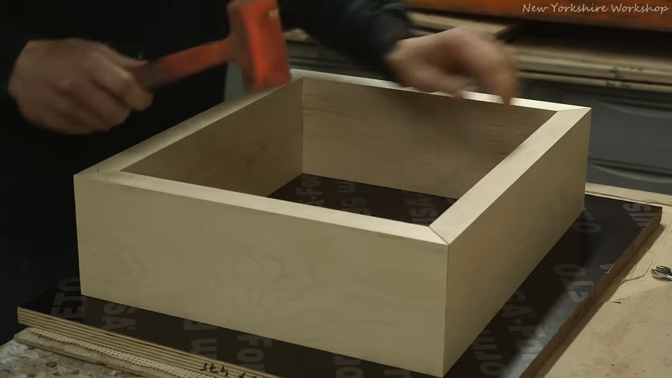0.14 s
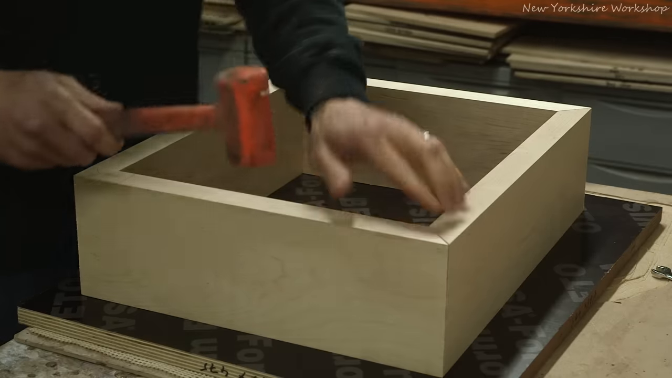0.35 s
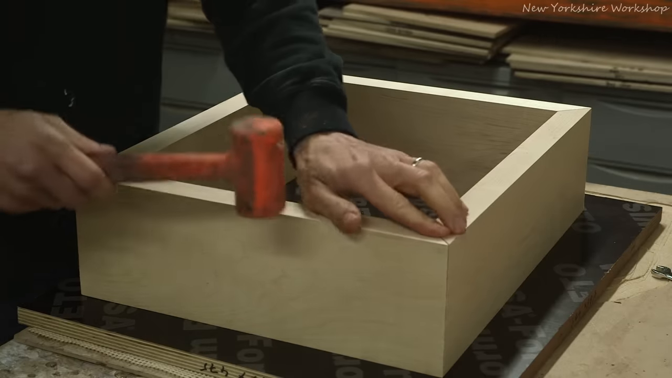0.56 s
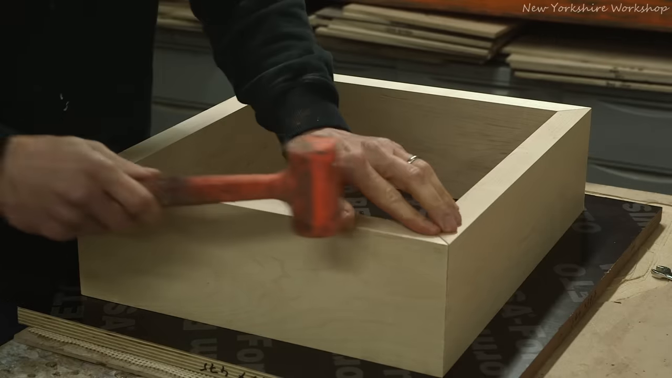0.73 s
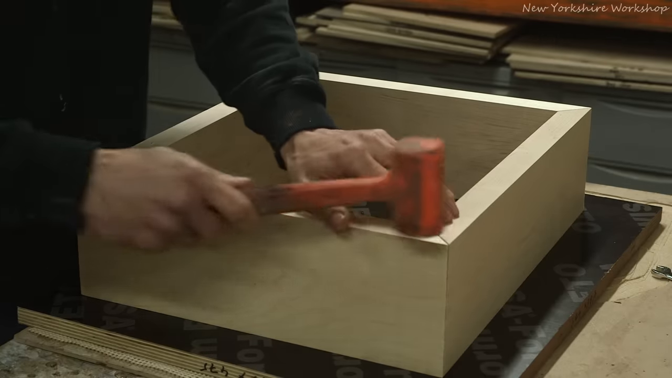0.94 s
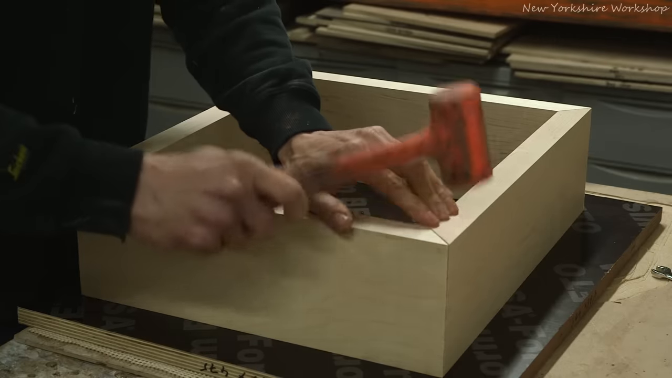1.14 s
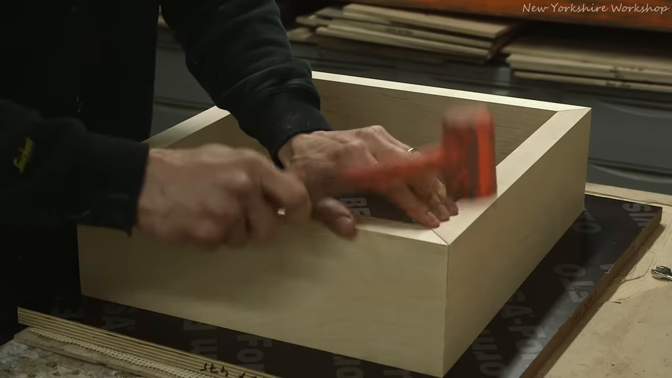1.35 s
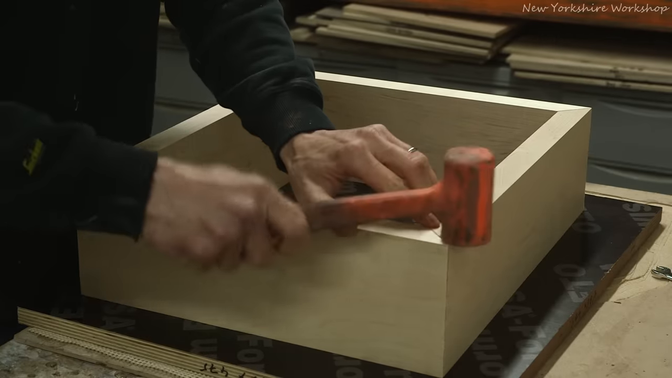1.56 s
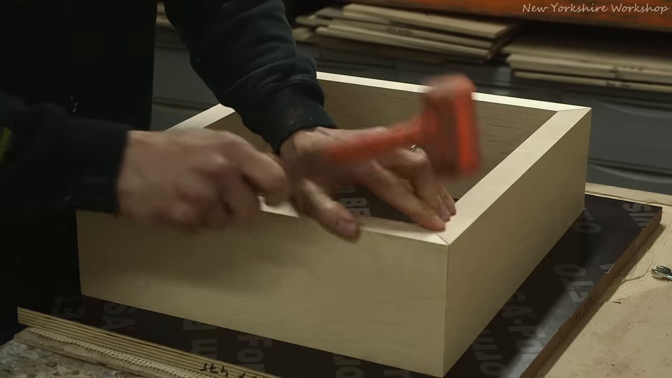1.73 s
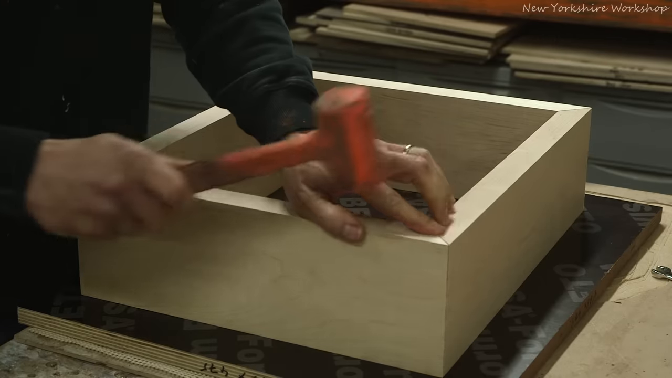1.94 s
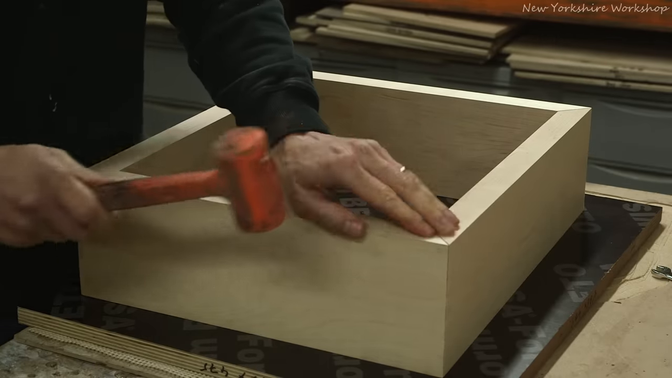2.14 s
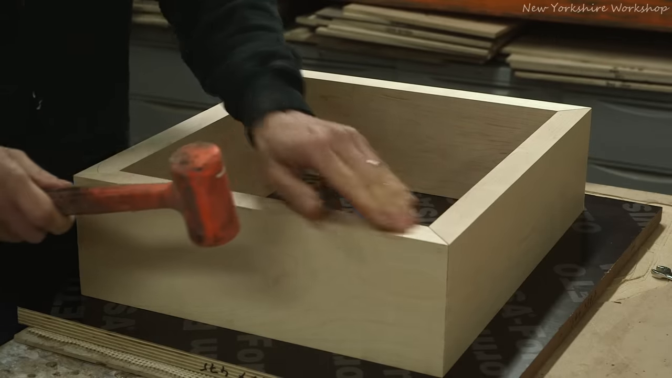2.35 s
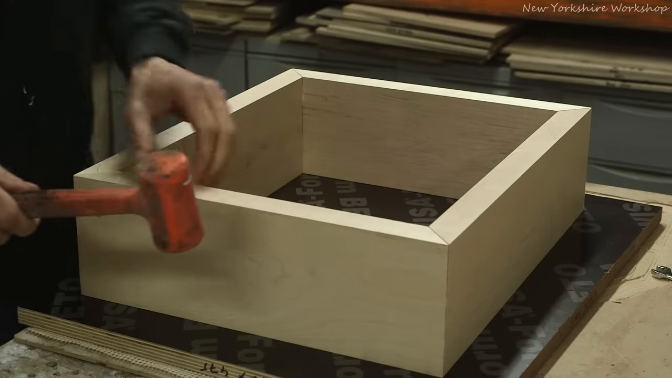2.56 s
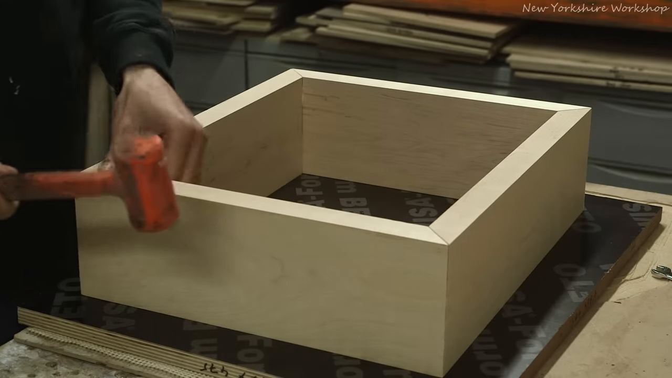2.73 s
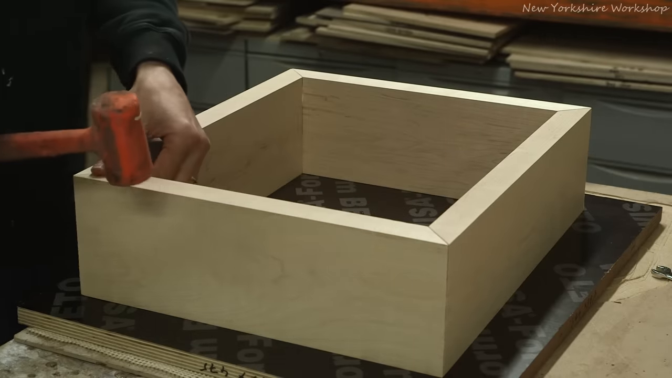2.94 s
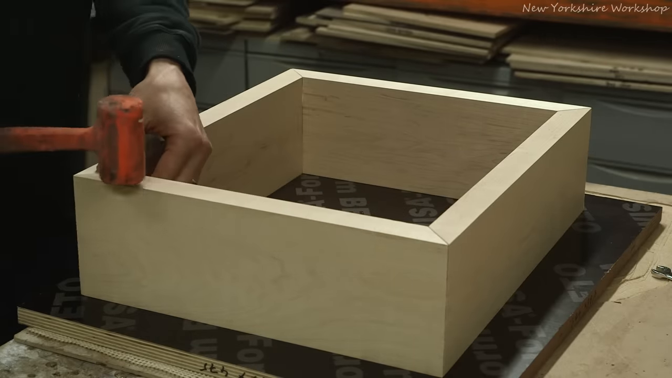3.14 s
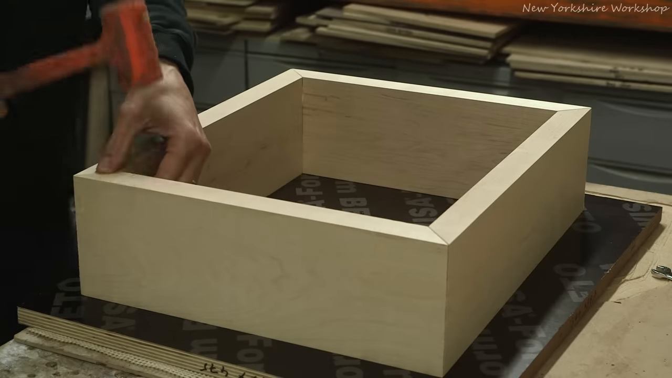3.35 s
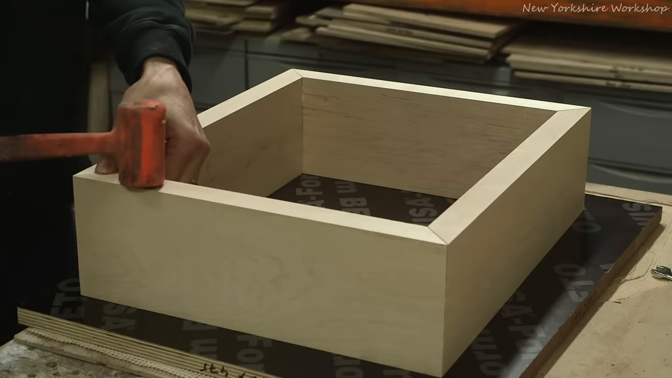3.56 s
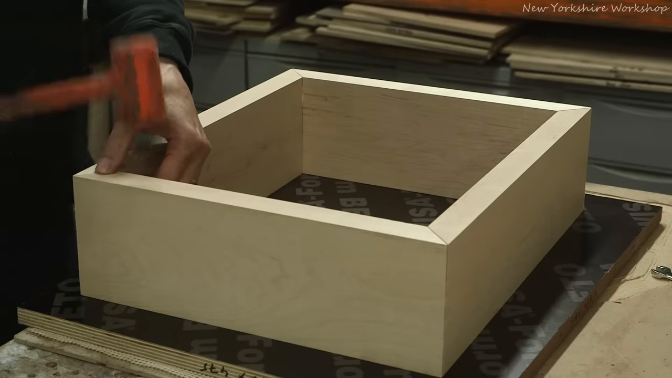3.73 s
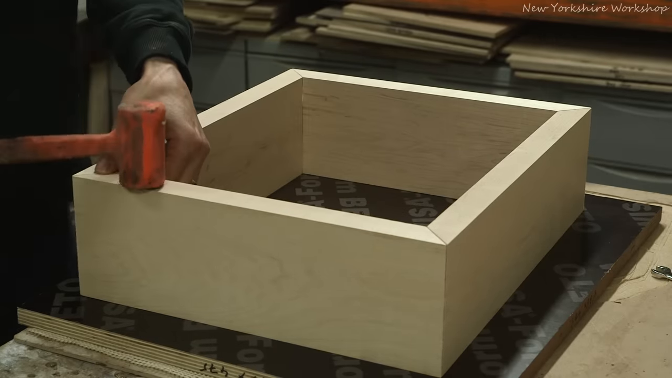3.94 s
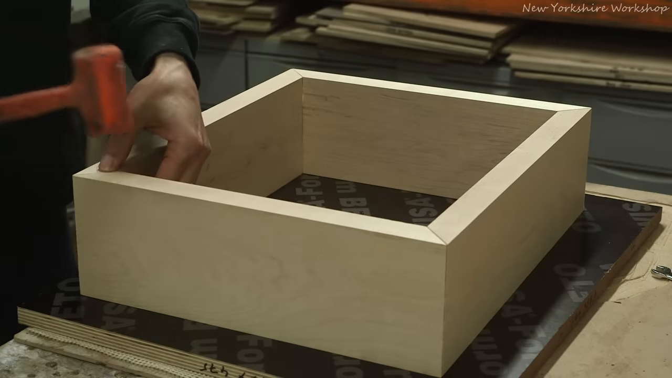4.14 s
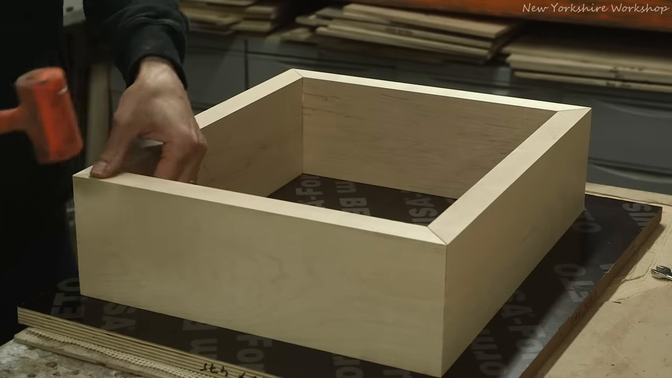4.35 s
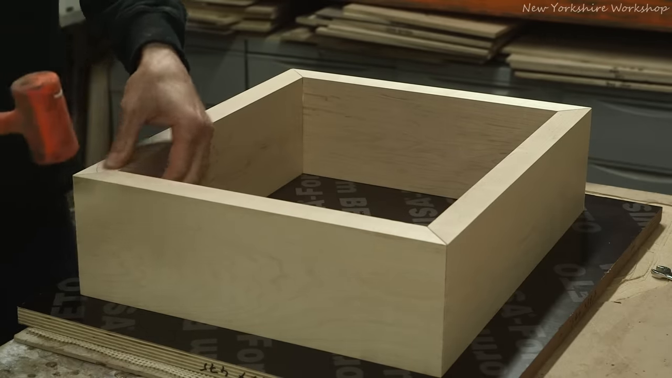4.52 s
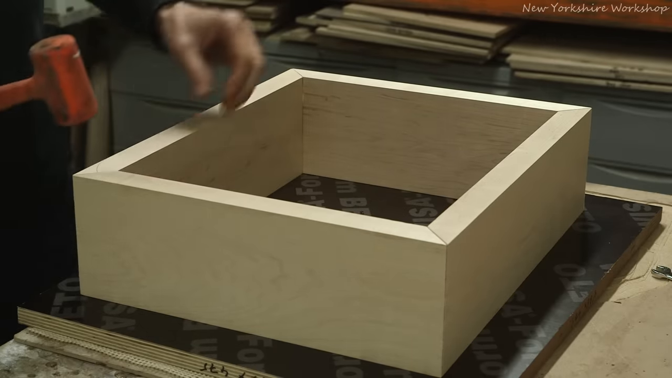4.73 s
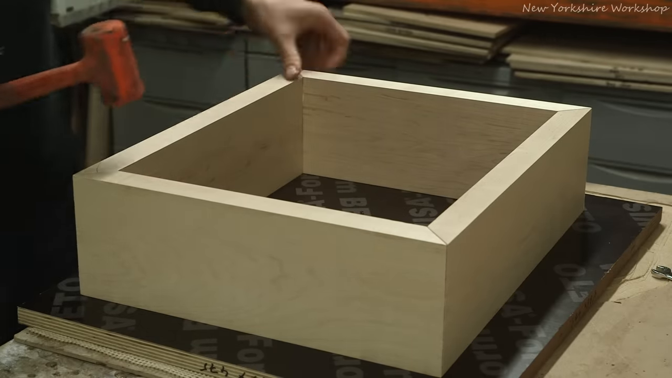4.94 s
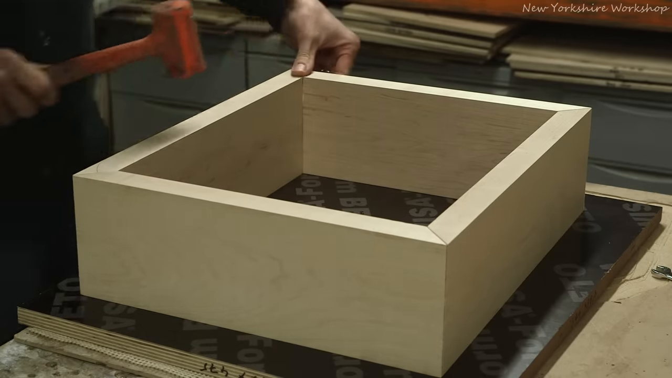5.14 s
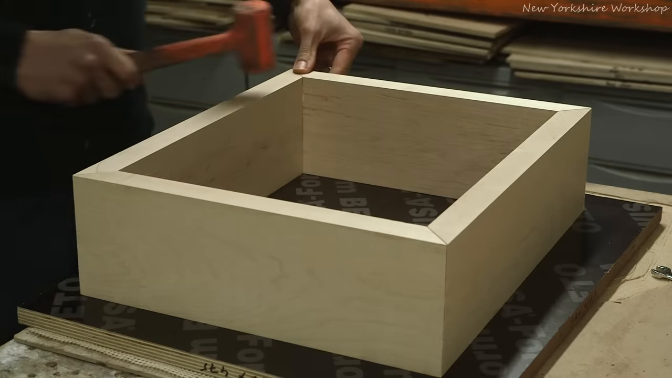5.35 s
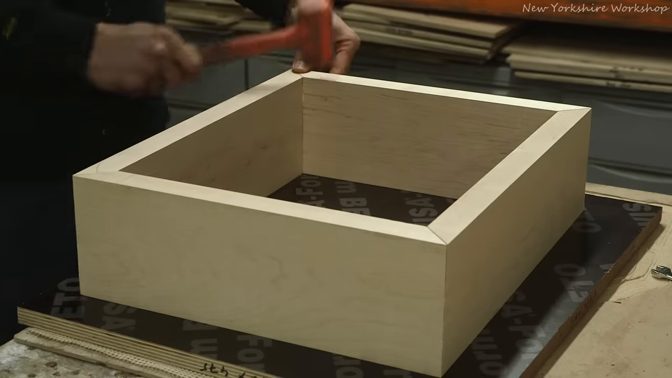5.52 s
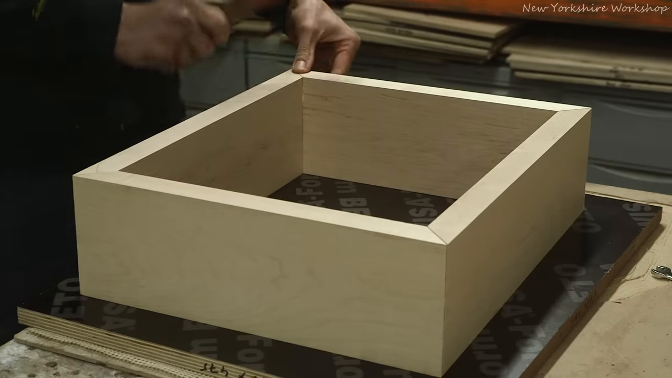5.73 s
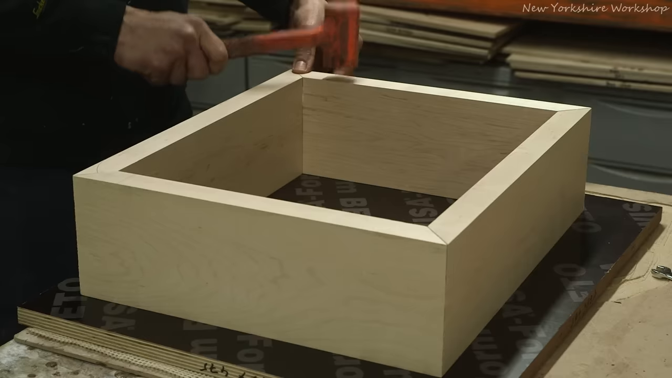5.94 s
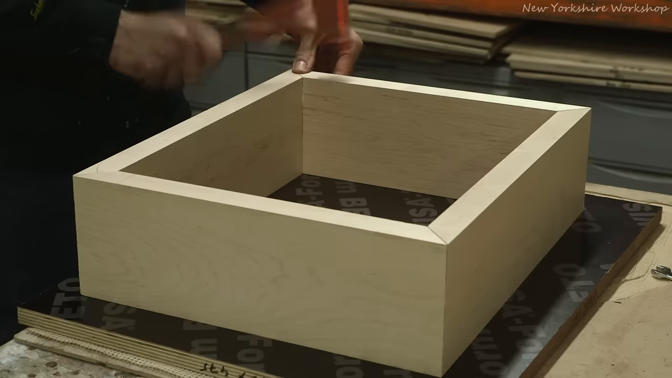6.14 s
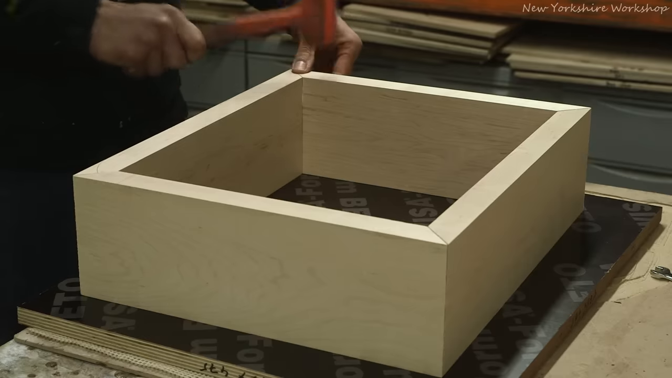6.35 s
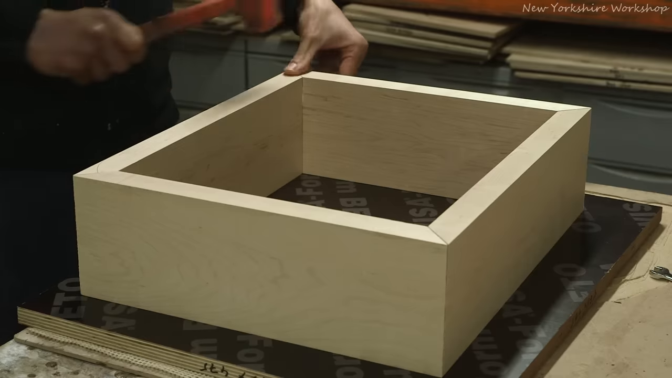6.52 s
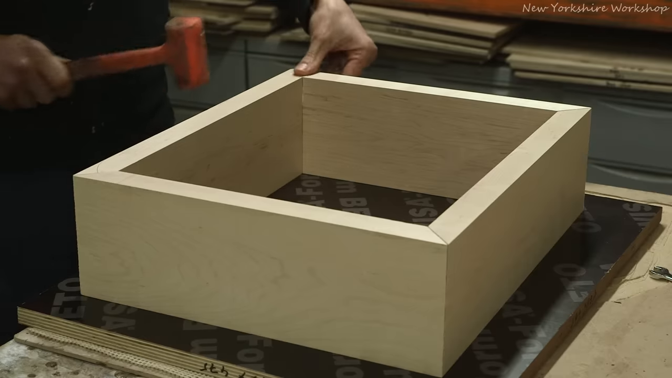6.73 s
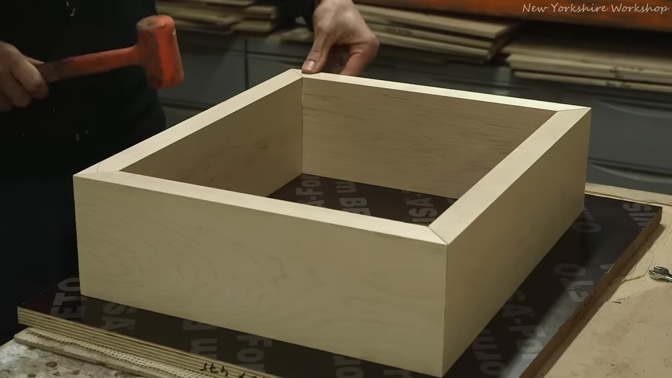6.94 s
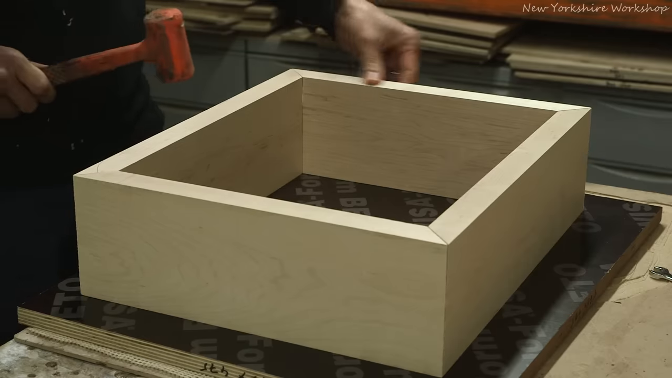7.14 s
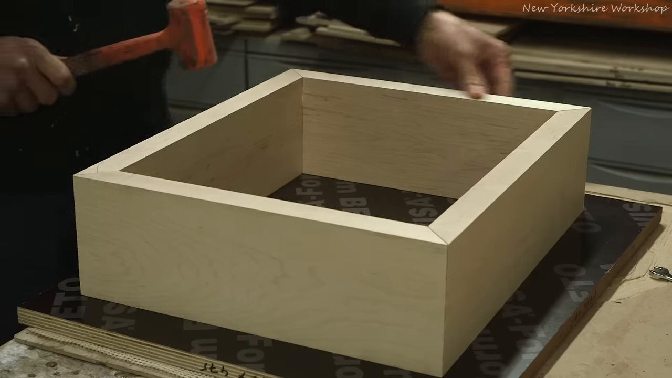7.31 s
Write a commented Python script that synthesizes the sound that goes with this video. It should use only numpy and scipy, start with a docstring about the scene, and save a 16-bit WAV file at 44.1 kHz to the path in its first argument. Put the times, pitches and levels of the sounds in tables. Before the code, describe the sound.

A shot-filled mallet knocks a wooden frame on a workbench six times, in three pairs about two seconds apart. Each blow is a sharp, woody knock with a short room ring, preceded by a tiny hiss of shot in the head. Between the pairs, sleeves rustle faintly and fingers rub and touch the wood. The knocks are close and central, over a quiet ventilation hum.

```python
"""Ventilation hums in a workshop; sleeves rustle and loose shot slides in a mallet's head as it is tipped.
From 1.2 s the mallet gives two blows to each of three corners of a wooden frame on a bench. The shot
hisses on the downswing; head, then shot, push the boards into short rings that the room carries on.
After each pair, fingers rub the joints and the wood is lightly touched. Sleeves rustle to the end."""
import sys
import numpy as np
from scipy import signal
from scipy.fft import rfft, irfft, next_fast_len
from scipy.io import wavfile

SR = 44100
rng = np.random.default_rng(int(sys.argv[2]) if len(sys.argv) > 2 else 0)


def unload_wav(signal):
    """Save mono or channel-first audio to the path in sys.argv[1] as 16-bit WAV at rate SR, clipped to [-1, 1]."""
    wavfile.write(
        sys.argv[1],
        SR,
        np.round(np.clip(np.atleast_2d(signal).T, -1, 1) * 32767).astype(np.int16),
    )


N = 329861

# Two blows a corner. Each row: start in s, level in dB, contact in ms, shot lag in ms,
# shot re head in dB, crack re knock in dB, bench thump in dB.
MALLET_BLOWS = [(1.2052, -24, 0.22, 3.4, 9, -19, 3), (1.5302, -17.5, 0.095, 1.98, 5.5, -10, -5),
                (3.4888, -18.5, 0.086, 3, 3, -16, -5), (3.8812, -19, 0.057, 2.13, 10, -9, -9),
                (5.7930, -17, 0.063, 2.4, 7, -10.5, -4), (6.1652, -16, 0.077, 2.8, 5, -11, -1)]
# Workshop reverb. Each row: frequency in Hz, t60 in s, level in dB, side re mid in dB.
ROOM_BANDS = [(60, 0.27, -2, -23), (120, 0.49, 3, -25.5), (230, 0.81, -3, -22), (460, .55, -2, -18),
              (888.9, 0.58, -3, -12), (1920, 0.54, -5.5, -6.5), (3700, 0.53, -9.5, -3),
              (5430, 0.51, -7.5, -0.5), (7600, .3, -7, -1.5), (10800, 0.24, -6.5, -0.5),
              (14800, .16, -7, -7)]


def undb(db):
    """dB to gain."""
    return 10 ** (np.asarray(db) / 20)


def unit(x):
    """Scale to rms 1."""
    return x / np.sqrt(np.mean(x ** 2))


def along(hz, table, column=1):
    """Read a table column on a log-frequency axis."""
    table = np.array(table, float)
    return np.interp(np.log(np.maximum(hz, 1)), np.log(table[:, 0]), table[:, column])


def shaped(x, db_at_hz):
    """Filter by a function of Hz that gives dB."""
    size = next_fast_len(x.shape[-1])
    gain = undb(db_at_hz(np.arange(size // 2 + 1) * SR / size))
    return irfft(rfft(x, size) * gain, size)[..., :x.shape[-1]]


def band(x, hz, width_hz):
    """Two-pole resonance, gain 1 at the centre."""
    return signal.lfilter(*signal.iirpeak(hz, hz / width_hz, fs=SR), x)


def causal(power):
    """Minimum-phase response for a power spectrum, by folded cepstrum; rms 1."""
    cepstrum = irfft(np.log(power + 1e-12 * power.max()) / 2)
    half = len(cepstrum) // 2
    cepstrum[1:half] *= 2
    cepstrum[half + 1:] = 0
    return unit(irfft(np.exp(rfft(cepstrum))))


def add(out, x, start_s):
    """Mix x into out."""
    i = int(start_s * SR)
    out[..., i:i + x.shape[-1]] += x[..., :N - i]


def walk(rate_hz):
    """Random values joined by straight lines."""
    knots_s = np.arange(0, N / SR + 1, 1 / rate_hz)
    return np.interp(np.arange(N) / SR, knots_s, rng.standard_normal(1000)[:len(knots_s)])


def wide_pair(mid, side):
    """Diffuse stereo: the side grows toward the treble."""
    side = shaped(side, lambda hz: along(hz, ROOM_BANDS, column=3))
    return np.array([mid + side, mid - side])


def near_pair(x):
    """Direct stereo: arrivals a fraction of a sample apart, showing only in the treble."""
    side = undb(-9) * np.gradient(x)
    return np.array([x + side, x - side])


def ventilation():
    """Broad air noise with wavering duct resonances; the level wanders slowly."""
    # Each row: frequency in Hz, relative density in dB.
    air_spectrum = [(20, -11.5), (32, -24), (50, -3), (80, -1.5), (160, -2.5), (280, -1.5), (470, -9),
                    (720, -10), (1000, -13), (1600, -14), (2200, -25), (5000, -34.5), (16000, -46)]
    # Each row: centre in Hz, width in Hz, level re air noise in dB.
    duct_modes = [(290, 16, -5.5), (170.75, 88, -17), (1460, 74, -24.5)]
    flows = []
    for _ in range(2):
        air = unit(shaped(rng.standard_normal(N), lambda hz: along(hz, air_spectrum)))
        hum = sum(undb(db) * unit(band(rng.standard_normal(N), hz, width)) for hz, width, db in duct_modes)
        flows.append(air + hum)
    mid, side = flows
    return undb(-66.5 + .5 * walk(rate_hz=1.3)) * wide_pair(mid, undb(1.5) * side)


def room_response():
    """Diffuse echoes from one spot on the bench build up in a few ms and die band by band."""
    early_db, early_t60_share = 5, .2  # nearby benches and shelves, re the tail
    t = np.arange(SR * 3 // 4) / SR
    echoes = 0
    for hz in 42 * 2 ** np.arange(0, 9, .5):
        white = rng.standard_normal((2, len(t)))
        noise = shaped(white, lambda f: -12 * (2 * np.log2(np.maximum(f, 1) / hz)) ** 2)
        t60_s = along(hz, ROOM_BANDS)
        early = undb(early_db) * 1000. ** (-t / (early_t60_share * t60_s))
        tail = 1000. ** (-t / t60_s)
        echoes += noise * (tail + early) * undb(along(hz, ROOM_BANDS, column=2))
    build_up = np.clip((t - .003) / .011, 0, 1)
    return wide_pair(*echoes * undb(-34) * build_up)


def grains(scatter_db):
    """Many tiny contacts: noise whose samples vary widely in size."""
    return unit(rng.standard_normal(N) * undb(scatter_db * rng.exponential(size=N)))


def gesture_power(gestures, db_columns):
    """Power of gestures that fade in, sag, flicker and fade out; the dB columns add."""
    edge_s, sag_db, flicker_db = .035, 1.5, 2
    t = np.arange(N) / SR
    power = 0
    for row in gestures:
        start_s, length_s = row[:2]
        db = sum(row[c] for c in db_columns) - sag_db * np.clip((t - start_s) / length_s, 0, 1)
        fade = np.clip(np.minimum(t - start_s, start_s + length_s - t) / edge_s + .5, 0, 1)
        power += (undb(db) * fade) ** 2
    return power * undb(2 * flicker_db * walk(rate_hz=25))


def handling():
    """Cloth and sliding shot rustle in fine grains; skin on wood hisses in fixed resonances."""
    # Each row: start in s, length in s, level in dB, brightness in dB.
    sleeve_brushes = [(0.07, .3, -82, -14), (0.405, 0.066, -80, -4), (0.88, 0.13, -84.5, -5),
                      (2.1, .09, -80.5, -5), (2.25, 0.076, -78.5, -1), (2.32, .1, -88, 10),
                      (4.54, .065, -82, -3), (6.96, 0.13, -82, 0), (7.085, 0.042, -71.5, -10),
                      (7.1, 0.41, -84, 7), (7.295, .2, -77.5, -4.5)]
    # Each row: start in s, length in s, rub in dB, broad hiss in dB, brightness in dB.
    finger_strokes = [(2.69, .09, -81, -81.5, -4), (2.81, 0.098, -76, -74.5, -10),
                      (2.93, .26, -82, -78, -17), (4.22, .135, -80.5, -76, -7), (4.395, .13, -80, -77, -7),
                      (5.1, 0.27, -82, -78, -9), (5.4, 0.23, -72.5, -80, -15),
                      (6.635, 0.25, -83.5, -77, -9)]
    # Each row: peak time in s, 20 dB rise in s, 20 dB fall in s, level in dB, brightness in dB.
    shot_slides = [(0.63, 0.19, 0.18, -72, -6), (0.768, 0.2, 0.2, -68.5, -13),
                   (2.538, 0.087, .07, -74, -20), (3.295, .09, 0.13, -57, -23),
                   (5.43, 0.083, .1, -65.5, -19.5), (5.52, 0.17, .2, -62.5, -19)]
    # Each row: frequency in Hz, relative density in dB.
    rustle_spectrum = [(1200, -18.5), (2200, -2.5), (3200, -5.5), (4800, -8), (7000, -17.5)]
    # Each row: centre in Hz, width in Hz, relative gain in dB.
    rub_modes = [(2520, 360, 0.5), (2980, 350, 3), (4100, 250, -10), (5300, 440, -1.5), (6700, 300, -3)]
    floor_db, floor_bright_db = -90.5, -8  # constant faint rustle
    t = np.arange(N) / SR
    low_power = undb(2 * floor_db) + gesture_power(sleeve_brushes, [2]) + gesture_power(finger_strokes, [3])
    high_power = undb(2 * (floor_db + floor_bright_db)) + gesture_power(sleeve_brushes, [2, 3])
    high_power += gesture_power(finger_strokes, [3, 4])
    for peak_s, rise_s, fall_s, db, bright_db in shot_slides:
        drop_db = 20 * np.maximum((peak_s - t) / rise_s, (t - peak_s) / fall_s)
        low_power += undb(2 * (db - drop_db))
        high_power += undb(2 * (db - drop_db + bright_db))
    low_spectrum = [(300, -44), *rustle_spectrum, (16000, -37)]
    mid_side = []
    for _ in range(2):
        low = unit(shaped(grains(scatter_db=1.4), lambda hz: along(hz, low_spectrum)))
        high = unit(band(grains(scatter_db=2), hz=7000, width_hz=7400))
        rub = unit(sum(undb(db) * band(band(rng.standard_normal(N), hz, width), hz, width)
                       for hz, width, db in rub_modes))
        rub_power = gesture_power(finger_strokes, [2])
        mid_side.append(np.sqrt(low_power) * low + np.sqrt(high_power) * high + np.sqrt(rub_power) * rub)
    return wide_pair(*mid_side)


def wood_taps():
    """Fingers and tool touch the wood: one damped sine each."""
    # Each row: start in s, peak in dB, pitch in Hz.
    touches = [(2.29, -64, 1200), (3.242, -61, 300.3), (5.055, -65, 220), (5.061, -68, 4430),
               (7.108, -69, 3400)]
    decay_cycles = 10
    out, t = np.zeros(N), np.arange(SR // 10) / SR
    for start_s, db, hz in touches:
        add(out, undb(db) * np.sin(2 * np.pi * hz * t) * np.exp(-t * hz / decay_cycles), start_s)
    return out


def shot_hiss():
    """Shot is thrown against the top of the head as a swing starts."""
    # Each row: start in s, gain in dB.
    swings = [(1.488, -50.5), (3.4514, -51), (3.8432, -50.5), (5.7497, -52.5), (6.119, -46)]
    centre_hz, width_hz, attack_s, t60_s = 6500, 12000, .0027, .051
    out, t = np.zeros(N), np.arange(SR // 10) / SR
    envelope = (1 - np.exp(-t / attack_s)) * 1000. ** (-t / t60_s)
    for start_s, db in swings:
        hiss = band(band(rng.standard_normal(len(t)), centre_hz, width_hz), centre_hz, width_hz)
        add(out, undb(db) * hiss * envelope, start_s)
    return out


def standing_waves():
    """Each blow rings the room's lowest modes, in mono; the lower two beat."""
    # Each row: frequency in Hz, t60 in s, level re blow in dB at the front, left and back corner.
    room_modes = [(77.4, 0.53, -28, -29, -35), (94, 0.49, -28, -29, -33), (196, 0.69, -24, -27.5, -29)]
    out, t = np.zeros(N), np.arange(SR) / SR
    for k, (start_s, db, *_) in enumerate(MALLET_BLOWS):
        for hz, t60_s, *corner_db in room_modes:
            ring = np.sin(2 * np.pi * hz * t) * 1000. ** (-t / t60_s)
            add(out, undb(db + corner_db[k // 2]) * ring, start_s)
    return out


def blow_force(lag_ms, shot_db):
    """The head lands first, then pellets scattered around their mean lag."""
    pellets, scatter_ms = 6, .9
    landing_ms = np.clip(lag_ms + scatter_ms * rng.standard_normal(pellets), 0, 20)
    landings = np.bincount((landing_ms * SR / 1000).astype(int), minlength=SR // 40)
    force = landings * undb(shot_db) / np.sqrt(pellets)
    force[0] += 1
    return force


def mallet():
    """Blows ring frame and bench with a noisy crack; a longer contact is a duller knock."""
    # Each row: frequency in Hz, t60 in s, relative height in dB struck at the front, left and back corner.
    wood_modes = [(82, 0.084, -20, -31.5, -27), (154, 0.46, -20.5, -8.5, -26.5),
                  (216, 0.066, -12, -7, -13.5), (319, 0.053, -3, -1.5, -9.5), (380, 0.024, -12.5, -7.5, -8),
                  (568, 0.035, 0, -1.5, -1.5), (651.2, 0.02, -2, -2, -1.5), (877, 0.01, -3, -7, -31),
                  (1005, 0.075, -9, -3, -2), (1140, 0.012, -5, -5, -5), (1433, 0.061, -8, -11, 4),
                  (1460, 0.0052, -18.5, -8.5, -2.5), (1830, 0.027, -17, -16, -13.5),
                  (2214, 0.0047, -4.5, -8, -8.5), (3020, .011, -17, -12.5, -19),
                  (3110, 0.0039, -26.5, -18.5, -6.5), (3640, 0.003, -4.5, -7.5, -18.5),
                  (5100, 0.0035, -25.5, -25.5, -20.5)]
    # Each row: frequency in Hz, relative density in dB.
    crack_spectrum = [(500, -26.5), (1500, 9.5), (3000, 3.5), (5000, -5), (8000, -13), (12000, -22),
                      (16000, -29)]
    bench_below_hz, low_cut_hz, room_send_db = 240, 80, -2.5
    crack_attack_s, crack_t60_s = .0003, .043
    size = 4096
    out, t, f = np.zeros((2, N)), np.arange(size) / SR, np.arange(size // 2 + 1) * SR / size
    modes = np.array(wood_modes, float)
    mode_hz, width_hz = modes[:, :1], np.log(1000) / (np.pi * modes[:, 1:2])
    is_bench = modes[:, 0] < bench_below_hz
    # air follows the boards' velocity, so each resonance vanishes toward 0 Hz
    resonances = 1 / (1 + ((f ** 2 - mode_hz ** 2) / (width_hz * np.maximum(f, 1))) ** 2)
    crack_power = undb(along(f, crack_spectrum)) ** 2
    crack_envelope = (1 - np.exp(-t / crack_attack_s)) * 1000. ** (-t / crack_t60_s)
    corner_echoes = [room_response() for _ in range(len(MALLET_BLOWS) // 2)]
    for k, (start_s, db, contact_ms, lag_ms, shot_db, crack_db, thump_db) in enumerate(MALLET_BLOWS):
        corner = k // 2
        wood_power = undb(modes[:, 2 + corner] + thump_db * is_bench) ** 2 @ resonances
        wood_power /= (1 + (2 * np.pi * f * contact_ms / 1000) ** 2) ** 2
        wood_power /= 1 + (low_cut_hz / np.maximum(f, 1)) ** 6  # small boards radiate no deep bass
        knock = unit(signal.fftconvolve(causal(wood_power), blow_force(lag_ms, shot_db))[:size])
        crack_noise = shaped(rng.standard_normal(size), lambda hz: along(hz, crack_spectrum))
        crack = unit(crack_noise * crack_envelope)
        add(out, undb(db) * near_pair(knock + undb(crack_db) * crack), start_s)
        # the walls receive all directions at once: a smoother sum of knock and crack
        diffuse = causal(wood_power / wood_power.sum() + undb(2 * crack_db) * crack_power / crack_power.sum())
        reverb = signal.fftconvolve(corner_echoes[corner], diffuse[None], axes=1)
        add(out, undb(db + room_send_db) * reverb, start_s)
    return out


def scene():
    """Bench near the centre; reverb, rustle and ventilation spread wide."""
    small_sounds = shot_hiss() + wood_taps()
    blows = mallet() + standing_waves()
    small_reverb = signal.oaconvolve(room_response(), small_sounds[None], axes=1)[:, :N]
    return blows + near_pair(small_sounds) + small_reverb + handling() + ventilation()


def record(dry):
    """Clip at full scale, then cut the top steeply."""
    cutoff_hz = 15700
    return signal.sosfilt(signal.ellip(8, .2, 70, cutoff_hz, fs=SR, output="sos"), np.clip(dry, -1, 1))


dry = scene()
out = record(dry)
unload_wav(out)
```